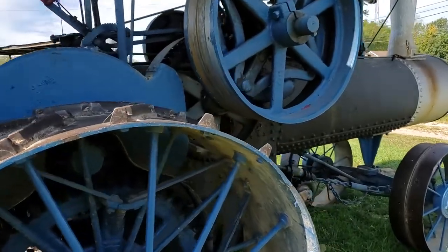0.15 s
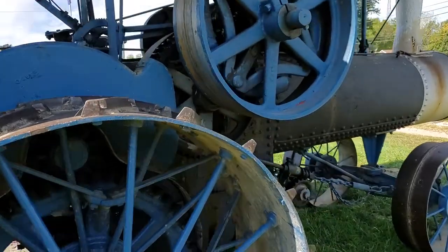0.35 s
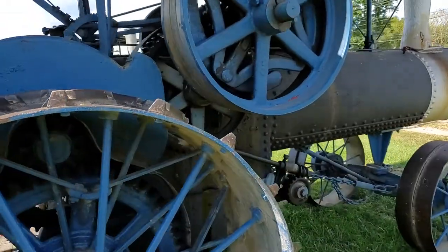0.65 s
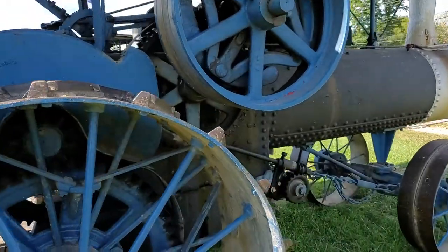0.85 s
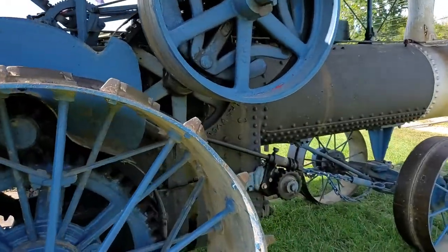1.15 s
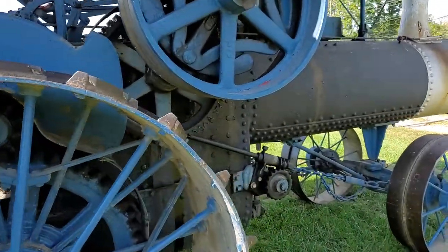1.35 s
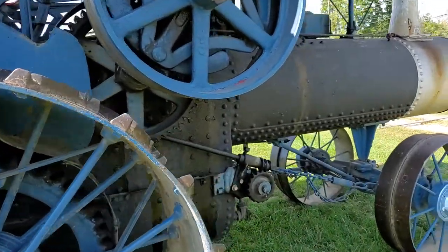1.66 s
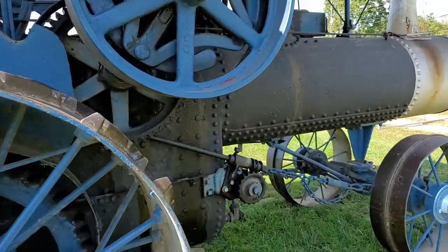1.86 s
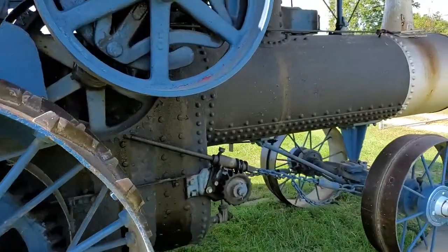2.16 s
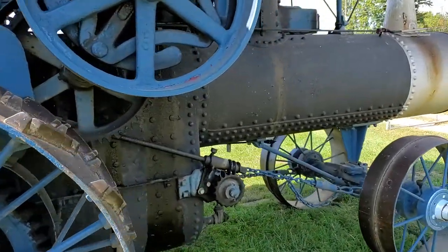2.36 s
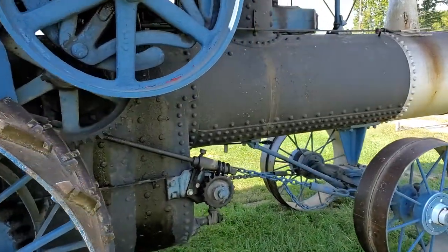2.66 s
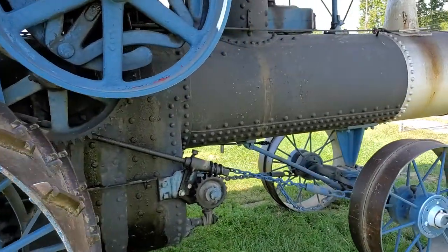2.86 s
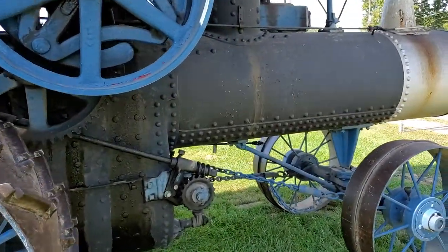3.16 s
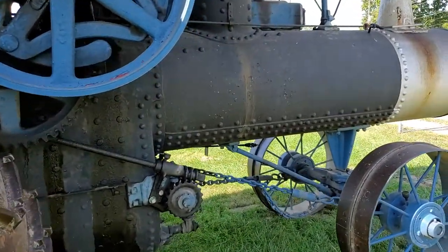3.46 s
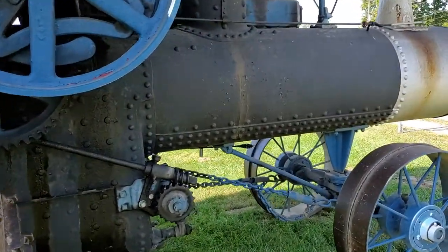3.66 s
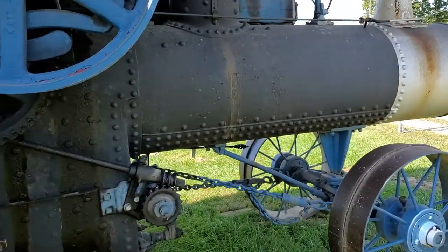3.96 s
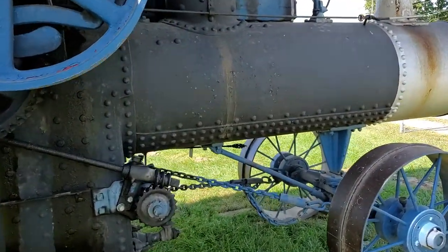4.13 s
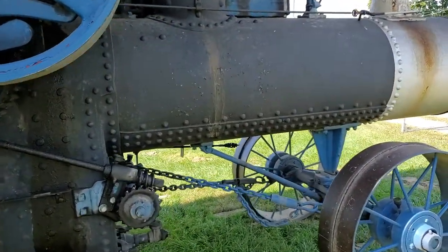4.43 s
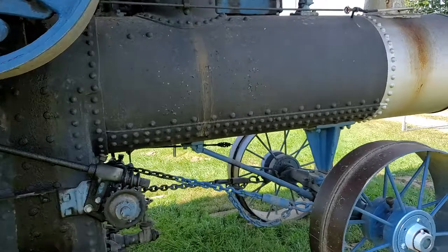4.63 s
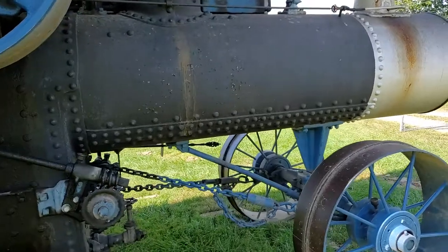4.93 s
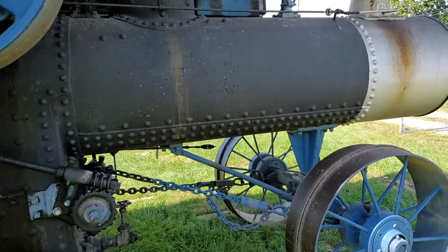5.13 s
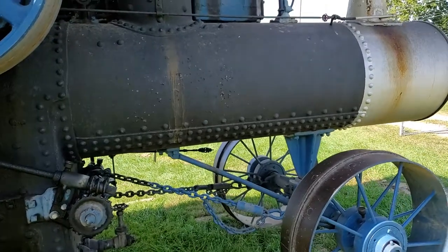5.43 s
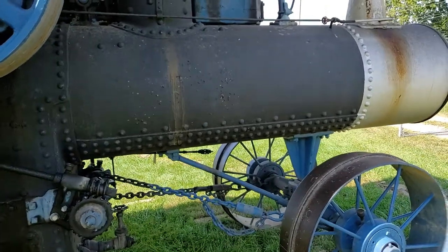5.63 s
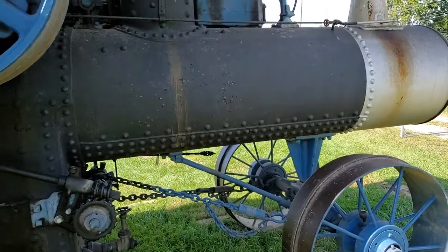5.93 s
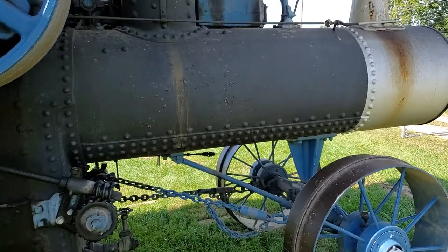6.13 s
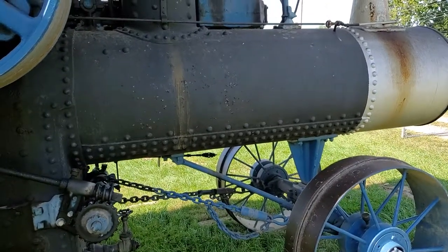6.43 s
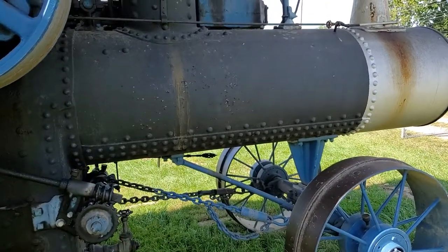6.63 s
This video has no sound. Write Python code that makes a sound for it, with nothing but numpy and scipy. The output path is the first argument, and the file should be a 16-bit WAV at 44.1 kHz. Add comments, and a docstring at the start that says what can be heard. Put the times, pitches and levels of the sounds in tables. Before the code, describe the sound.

Deep lumpy engine throbbing rises and falls close by, over steady steam hiss, crisp rhythmic spits, tiny whistles and a few wet squirts outdoors.

```python
"""Show field, 6.8 s: stereo microphone ports are carried along the boiler of a traction engine ticking over.
From the start an uneven twin, most likely a V-twin, booms close by: firing pulses ring a silencer and tailpipe.
It drops to idle by 1 s. Noise jets hiss and whistle from the cylinder, and noise bursts spit with the crank.
Wet squirts rasp and chirp at 0.2 and 2 s. Revs peak near 2.6 and 3.3 s; a smokebox leak opens from about 3 s.
After 5 s sine strands whine faintly, stray spits thicken, and a third rev is rising at the end."""
import sys
import numpy as np
from scipy import signal
from scipy.fft import rfft, irfft, next_fast_len
from scipy.io import wavfile
from scipy.ndimage import uniform_filter1d

SR = 44100
rng = np.random.default_rng(int(sys.argv[2]) if len(sys.argv) > 2 else 0)


def waveform_to_disk(signal):
    """Save audio, clipped to [-1, 1], as 16-bit WAV at the path in sys.argv[1]."""
    frames = np.transpose(np.atleast_2d(signal))
    scaled = np.clip(frames, -1, 1) * 32767
    samples = np.round(scaled).astype(np.int16)
    wavfile.write(sys.argv[1], SR, samples)


N = 299439
T = np.arange(N) / SR
# frequency axis [Hz] of a padded transform, so that filters do not wrap round
FREQS = np.fft.rfftfreq(2 * next_fast_len(N // 2 + 8192, True), 1 / SR)
PORT_LAG = 20  # delay between the two microphone ports [samples]
IDLE_HZ, FAST_HZ = 10.5, 15.5  # twin's reference speeds [four-stroke cycles/s]


# Twin close by, running speed: (time [s], four-stroke cycles per second [Hz])
TWIN_SPEED = [(0.0, 11.911), (0.57, 10.22), (0.778, 8.747), (1.052, 8.044), (1.47, 10.611), (1.751, 10.093),
              (2.145, 13.187), (2.403, 16.066), (2.631, 17.708), (2.895, 11.767), (3.262, 16.38),
              (4.055, 15.005), (4.29, 14.206), (5.016, 13.891), (5.05, 13.593), (6.098, 11.475),
              (6.482, 16.189), (6.79, 17.677)]
# Twin, boom level before a small trim: (time [s], level [dB])
EXHAUST_LEVEL = [(0.06, -22.5), (0.75, -26), (0.77, -22), (0.99, -27.5), (1.4, -19.5), (1.44, -21),
                 (2.39, -14.5), (2.74, -20), (2.76, -19.5), (2.87, -25), (2.95, -19), (3.21, -14),
                 (3.54, -17.5), (4.92, -18), (5.11, -21), (6.0, -21.5), (6.3, -16), (6.75, -16)]
# Silencer response, relative: (frequency [Hz], gain [dB])
SILENCER_RESPONSE = [(25, -38.5), (33, -18.5), (43, 0), (52, -9), (64, 4), (78, 7), (95, 2), (114, -2),
                     (160, -14), (210, -13.5), (245, -26), (300, -26), (420, -44.5), (4000, -130)]
# Tailpipe response, relative: (frequency [Hz], gain [dB])
TAILPIPE_RESPONSE = [(200, -44.5), (300, 1.5), (355, 4.5), (425, -0.5), (490, -27.5), (900, -21),
                     (5000, -100)]
# Upper silencer resonances: (frequency [Hz], width [Hz], level at FAST_HZ [dB],
# growth with speed [dB per Hz], growth with acceleration [dB per Hz/s])
BARK_RESONANCES = [(121.5, 25, -35, -0.1, 0.6), (170.6, 62, -34.5, 1, 0.61), (228.1, 17, -44.5, 3.5, 0.5)]
# Sharp edge of the blow-down: level at FAST_HZ [dB], growth with speed [dB per Hz]
EDGE_DB, EDGE_DB_PER_HZ = -47, 3.5
# Slow lope: resonance [Hz], width [Hz], level up to IDLE_HZ [dB], change per Hz above it [dB]
LOPE_HZ, LOPE_WIDTH_HZ, LOPE_DB, LOPE_DB_PER_HZ = 51.5, 8.8, -31, -2.83


def twin_engine():
    """Firings boom in the silencer and lope at idle; speed and load bring out its bark and ring the tailpipe."""
    cycle_hz, = curves(TWIN_SPEED)
    exhaust_db, = curves(EXHAUST_LEVEL)
    # only acceleration counts as load
    load = np.maximum(uniform_filter1d(np.gradient(cycle_hz) * SR, size=6000), 0)
    above_fast_hz = cycle_hz - FAST_HZ
    pulses, edges = firings(cycle_hz)

    # gas churns in the pipe between the pulses, most of all at idle
    churn_db = np.interp(cycle_hz, [IDLE_HZ, FAST_HZ], [-4, -15])
    flow = undb(churn_db) * rng.standard_normal(N) - unit(pulses)
    boom = levelled(ring(flow, SILENCER_RESPONSE), exhaust_db - 1.17)

    bark = 0
    for hz, width, db, db_per_hz, db_per_load in BARK_RESONANCES:
        band = filtered(boom, resonance(hz, width / 2) ** 2)
        bark = bark + levelled(band, db + db_per_hz * above_fast_hz + db_per_load * load)

    lope_band = filtered(boom, resonance(LOPE_HZ, LOPE_WIDTH_HZ / 2) ** 2)
    lope = levelled(lope_band, LOPE_DB + LOPE_DB_PER_HZ * np.maximum(cycle_hz - IDLE_HZ, 0))
    edge = levelled(ring(edges, TAILPIPE_RESPONSE), EDGE_DB + EDGE_DB_PER_HZ * above_fast_hz)
    return scattered(boom + bark + lope + edge, wet_db=-21.5, t60_s=0.27)


# Gas pulses of one cycle, in rows: first blow-down, its piston push, second blow-down, its piston push,
# intake gulp: (place in the cycle [0-1], lead by a shorter pipe [s], relative size at IDLE_HZ [ratio],
# relative size at FAST_HZ [ratio], share of the sharp edge [ratio])
GAS_PULSES = [(.194, 0, .75, .75, 1), (.37, 0, .55, -.05, 0), (.63, .0024, .9, 1, .45),
              (.79, 0, .4, .05, 0), (.86, 0, 0, -.42, 0)]


def firings(cycle_hz):
    """The gas pulses of a twin and their sharp edges; slow running is the most ragged."""
    scatter_db, jitter_s = 1.1, .0004  # spreads at FAST_HZ
    turns = np.cumsum(cycle_hz) / SR
    cycles = np.arange(int(turns[-1]) + 1)
    # the extra last sample collects whatever falls past the end
    pulses, edges = np.zeros(N + 1), np.zeros(N + 1)
    for place, lead_s, idle, fast, sharp in GAS_PULSES:
        times = np.interp(cycles + place, turns, T, right=2 * T[-1]) - lead_s
        hz = np.interp(times, T, cycle_hz)
        raggedness = (FAST_HZ / hz) ** 2
        timing, strength = rng.standard_normal((len(times), 2)).T * raggedness
        at = np.clip((times + jitter_s * timing) * SR, 0, N).astype(int)
        size = undb(scatter_db * strength)
        pulses[at] += size * np.interp(hz, [IDLE_HZ, FAST_HZ], [idle, fast])
        edges[at] += size * sharp
    return pulses[:N], edges[:N]


# Walk along the boiler: (time [s], cylinder steam level [dB], smokebox leak level [dB])
BOILER_WALK = [(0, -37, -52), (.6, -38.5, -66), (1.5, -36, -75), (3.2, -38, -45.5), (4.6, -39, -44),
               (5.45, -35.5, -37.5), (6.25, -37, -36.5), (6.79, -36, -45)]
# Steam around cylinder and boiler, relative spectrum: (frequency [Hz], density [dB per Hz])
CYLINDER_STEAM = [(20, -4), (250, 11.5), (500, 4.5), (900, 4.5), (1500, 0), (3400, 0.5), (4600, -4),
                  (6700, -5.5), (7600, -10), (9200, -13), (10500, -14), (12000, -12.5), (14300, -19),
                  (15700, -18)]
# Leak at the smokebox end, relative spectrum: (frequency [Hz], density [dB per Hz])
SMOKEBOX_LEAK = [(400, -48), (570, 3), (670, -7), (770, -17), (930, 4), (1350, -0.5), (1750, -4.5),
                 (2300, -1), (3000, 0.5), (4300, -12), (6500, -13), (8000, -16.5), (12400, -23),
                 (16000, -21)]
# Jets coming into the open between wheels and boiler, level before flicker:
# (time most open [s], half length [s], centre [Hz], width [Hz], level [dB])
OPEN_JETS = [(0.198, 1.4, 970, 650, -44), (1.95, .35, 905, 620, -46.5), (3.0, 3.2, 2420, 2300, -51.5),
             (4.303, 0.083, 2500, 700, -45), (5.44, .45, 2240, 2000, -41), (5.6, 2.7, 12200, 1500, -52),
             (5.7, .9, 2590, 90, -59), (6.4, 2.1, 900, 620, -50.5), (6.22, 0.1, 2700, 1200, -41),
             (6.6, 0.69, 2980, 1500, -41), (6.55, 0.63, 2980, 256, -46)]


def leaks():
    """Turbulent steam sputters from the cylinder on the left and from the smokebox end on the right."""
    steam_db, front_db = curves(BOILER_WALK)
    near = unit(filtered(jet(PORT_LAG, direct=0.35), response(CYLINDER_STEAM))) * undb(steam_db)
    for s, half_s, hz, width, db in OPEN_JETS:
        hiss = unit(filtered(jet(PORT_LAG, direct=0.13), resonance(hz, width / 2)))
        near = near + hiss * undb(db) * bell(s, half_s)
    near_flicker_db = 0.98 * wander(25) + 1.38 * wander(250)

    # the negative lag brings the smokebox hiss to the right port first
    front = unit(filtered(jet(-PORT_LAG, direct=0.99), response(SMOKEBOX_LEAK)))
    front_flicker_db = 1.1 * wander(6.1) + 1.4 * wander(120)
    return near * undb(near_flicker_db) + front * undb(front_db + front_flicker_db)


# Colour of a spit centred on SPIT_HZ, relative: (frequency [Hz], gain [dB])
SPIT_SPECTRUM = [(800, -23), (2200, 7), (3500, 0.5), (4800, 6.5), (6200, 10.5), (7500, -4), (10000, -2.5),
                 (16000, -15)]
# The first, wettest spits trail most: (time [s], level of the tail against the crack [dB])
TAIL_LEVEL = [(.55, -30), (.67, -1), (1.3, -11), (6.7, -23)]
SPIT_HZ = 5800
# Decay times of the short crack and its softer trailing hiss [s]
SPIT_CRACK_S, SPIT_TAIL_S = 0.0041, 0.031


def spits(spit_rows, rise_s=0.00072, gain_db=-2.5, size=4096):
    """Wet steam forced through a gland makes short noise bursts, each a crack with a trailing hiss."""
    out = np.zeros((2, N + size))
    t, freqs = np.arange(size) / SR, np.fft.rfftfreq(size, 1 / SR)
    rise = 1 - np.exp(-(t / rise_s) ** 2)
    for s, db, hz in spit_rows:
        # stretching the frequency axis moves the colour to this spit's centre
        colour = response(SPIT_SPECTRUM, freqs * SPIT_HZ / hz)
        gas = unit(irfft(rfft(rng.standard_normal((2, size))) * colour))
        tail = undb(np.interp(s, *np.transpose(TAIL_LEVEL)))
        burst = rise * (np.exp(-t / SPIT_CRACK_S) + tail * np.exp(-t / SPIT_TAIL_S))
        start = int(s * SR)
        out[:, start:start + size] += gas * burst / burst.max() * undb(db + gain_db)
    return out[:, :N]


# Loud spits of wet steam, level before the trim in spits(): (time [s], level [dB], centre [Hz])
LOUD_SPITS = [(0.6707, -28.5, 5400), (0.7923, -28, 5100), (0.9176, -27, 5470), (1.166, -31, 5100),
              (1.292, -32, 6100), (1.4165, -28, 6100), (1.7795, -36, 6170), (1.897, -28.5, 4000),
              (2.6523, -31.5, 5550), (3.1631, -28.5, 6300), (3.495, -29.5, 6360), (3.6074, -27.5, 6060),
              (3.718, -30.5, 5700), (4.059, -29.5, 6520), (4.1734, -28.5, 6200), (4.2884, -30.5, 6400),
              (5.229, -32, 6660), (5.467, -31.5, 6700), (5.5847, -28, 6450), (5.8204, -29, 3560),
              (6.109, -27, 3830), (6.2282, -29, 6200), (6.3466, -30.5, 6690), (6.632, -26.5, 5740),
              (6.6915, -29, 6710), (6.7268, -30, 6500), (6.7494, -27.5, 6600)]
# Steam engine turning over: (time [s], piston strokes per second [Hz])
PISTON_STROKES = [(0.0, 9.891), (0.7, 7.958), (1.3, 8.111), (3.45, 9.098), (4.7, 8.428), (5.6, 8.476),
                  (6.2, 8.685), (6.79, 8.473)]
# Faint spit of an ordinary stroke: level before that trim [dB], scatter [dB], centre [Hz]
STROKE_DB, STROKE_SCATTER_DB, STROKE_CENTRE_HZ = -36.5, 3.1, 6200
# Strays gather toward the smokebox, at the end: level before that trim [dB], scatter [dB], spread [s]
STRAY_DB, STRAY_SCATTER_DB, STRAY_SPREAD_S = -33, 1.5, 1.1


def spitting(count=16):
    """Rows (time [s], level [dB], centre [Hz]): loud spits, a faint one per remaining stroke, and strays."""
    rows, loud_s = list(LOUD_SPITS), np.transpose(LOUD_SPITS)[0]
    stroke_hz, = curves(PISTON_STROKES)
    strokes_done = np.floor(np.cumsum(stroke_hz) / SR)
    stroke_s = T[1:][np.diff(strokes_done) > 0]
    for s, (strength, colour) in zip(stroke_s, rng.standard_normal((len(stroke_s), 2))):
        # a loud spit within 20 ms already stands for this stroke
        if np.abs(loud_s - s).min() > .02:
            hz = STROKE_CENTRE_HZ * np.exp(0.047 * colour)
            rows.append((s, STROKE_DB + STROKE_SCATTER_DB * strength, hz))
    for place, strength, colour in rng.standard_normal((count, 3)):
        s = max(T[-1] - STRAY_SPREAD_S * abs(place), 0)
        hz = STROKE_CENTRE_HZ * np.exp(0.17 * colour)
        rows.append((s, STRAY_DB + STRAY_SCATTER_DB * strength, hz))
    return rows


# Thin whistles of the leaks, levels before a fast flutter: (frequency [Hz], width [Hz],
# resting level [dB], flicker [dB], level against a passing spit [dB])
LEAK_WHISTLES = [(5620, 57, -60, 2, -24), (6710, 220, -57, -1, -18.5), (13570, 700, -59, 4.5, -37)]
# A whistle flares up: (time at the middle [s], half length [s], nearest whistle [Hz], level [dB])
WHISTLE_FLARES = [(0.014, .03, 5660, -44.5), (0.143, .03, 6710, -53), (.81, 0.022, 13570, -43),
                  (0.873, 0.015, 5660, -40), (1.29, .025, 13570, -48), (1.904, 0.033, 13570, -47),
                  (2.248, 0.091, 6710, -48), (2.654, .02, 5660, -50), (2.79, 0.02, 5660, -46),
                  (3.057, .03, 6710, -46), (3.2, .06, 13570, -51), (3.426, .02, 5660, -44),
                  (3.698, 0.064, 5660, -45), (3.773, 0.062, 13570, -50), (4.02, .018, 13570, -41),
                  (4.83, 0.015, 5660, -44), (5.044, 0.017, 5660, -41.5), (5.11, .025, 13570, -44),
                  (5.647, 0.013, 5660, -42), (6.6, 0.024, 5660, -42)]
# Decay after a spit [s] and rate of the resting flicker [per s]
WHISTLE_RING_S, FLICKER_PER_S = 0.016, 11


def whistles(spit_rows):
    """Narrow gaps sing unsteadily; each spit blows them harder, and now and then one flares up."""
    out, pitches = 0, np.transpose(LEAK_WHISTLES)[0]
    kicks = np.zeros(N)
    for s, db, _ in spit_rows:
        kicks[min(int(s * SR), N - 1)] += undb(db)
    blown = signal.lfilter([1], [1, -np.exp(-1 / (WHISTLE_RING_S * SR))], kicks)

    for k, (hz, width, rest_db, flicker_db, spit_db) in enumerate(LEAK_WHISTLES):
        flares = 0
        for s, half_s, which_hz, db in WHISTLE_FLARES:
            if np.abs(pitches - which_hz).argmin() == k:
                flares = flares + undb(db) * bell(s, half_s)
        resting = undb(rest_db + flicker_db * wander(FLICKER_PER_S))
        drive = np.sqrt(resting ** 2 + (undb(spit_db) * blown) ** 2 + flares ** 2)
        tone = unit(filtered(jet(PORT_LAG, direct=0.44), resonance(hz, width / 2)))
        out = out + tone * drive * undb(2.5 * wander(70))
    return out


# Longer squirts: (time at the middle [s], half length [s], rasp level [dB], chirp pitch at the middle [Hz])
WATER_SQUIRTS = [(0.177, 0.015, -35.5, 3350), (1.944, 0.03, -39, 3080), (2.024, 0.023, -43, 2500)]
# Resonances of the squirting gap, relative: (frequency [Hz], width [Hz], gain [dB])
GAP_RESONANCES = [(930, 680, -16), (2500, 2000, 0), (3270, 180, -1), (5100, 800, -1), (9000, 1040, -2)]
# Chirp: level against the rasp [dB], glide [Hz per s], wobble [Hz]
CHIRP_DB, CHIRP_GLIDE_HZ_PER_S, CHIRP_WOBBLE_HZ = -4.5, -3000, 130


def squirts():
    """Now and then a slug of water squirts out with a rasp and a brief falling chirp."""
    gap = sum(undb(db) * resonance(hz, width / 2) for hz, width, db in GAP_RESONANCES)
    rasp, out = unit(filtered(jet(PORT_LAG, direct=0.17), gap)), 0
    for s, half_s, db, hz in WATER_SQUIRTS:
        glide_hz = CHIRP_GLIDE_HZ_PER_S * np.clip(T - s, -2 * half_s, 2 * half_s)
        chirp = sine(hz + glide_hz + CHIRP_WOBBLE_HZ * wander(500))
        out = out + undb(db) * bell(s, half_s) * (rasp + undb(CHIRP_DB) * chirp)
    return out


# Faint whine, level before strand offset and flicker: (time [s], pitch [Hz], level [dB])
WHINE_COURSE = [(4.8, 625, -80), (5.1, 635, -58), (5.65, 670, -54), (5.9, 686, -55), (6.15, 670, -54),
                (6.37, 664, -50), (6.54, 677, -48), (6.79, 704, -55)]
# Strands of the whine: (multiple of its pitch [ratio], level offset [dB])
STRANDS = [(1, 0.5), (.875, -5)]


def whine():
    """Two sine strands of wavering pitch and level make a faint whine that ends higher than it began."""
    hz, db = curves(WHINE_COURSE)
    out = 0
    for multiple, strand_db in STRANDS:
        strand = sine(multiple * hz + 5 * wander(50))
        out = out + strand * undb(db + strand_db + 2.5 * wander(30))
    return out


def scattered(x, wet_db, t60_s, size=8192):
    """Iron wheels and boiler throw a short, diffuse tail to each port."""
    tail = rng.standard_normal((2, size)) * undb(-60 * np.arange(size) / SR / t60_s)
    wet = signal.fftconvolve(x[None], unit(tail) / np.sqrt(size), axes=1)[:, :N]
    return x + undb(wet_db) * wet


def long_waves(x, alike_hz=380):
    """The two ports are close together, so they hear the bass alike."""
    alike = 1 / (1 + (FREQS / alike_hz) ** 4)
    mid, side = x[0] + x[1], filtered(x[0] - x[1], np.sqrt(1 - alike))
    return np.array([mid + side, mid - side]) / 2


def jet(lag, direct):
    """Stereo turbulence: a direct share that reaches the right port lag samples late, the rest scattered."""
    source = rng.standard_normal(N)
    direct = np.clip(direct, 0, 1)
    straight = np.array([source, np.roll(source, lag)])
    return np.sqrt(direct) * straight + np.sqrt(1 - direct) * rng.standard_normal((2, N))


def ring(x, points, size=32768):
    """Pass x through a causal body that has the given response."""
    # folding the cepstrum forward gives the minimum-phase response
    cepstrum = irfft(np.log(response(points, np.fft.rfftfreq(size, 1 / SR))))
    cepstrum[1:size // 2] *= 2
    cepstrum[size // 2 + 1:] = 0
    return signal.fftconvolve(x, irfft(np.exp(rfft(cepstrum))))[:N]


def levelled(x, db):
    """Give x the level db, taken over a few firings."""
    power = uniform_filter1d(uniform_filter1d(x ** 2, size=5000), size=5000)
    return x * undb(db) / np.sqrt(power + 1e-12)


def resonance(hz, half_width):
    """Gain of a resonance that falls to half at half_width [Hz] from its centre."""
    return 1 / (1 + ((FREQS - hz) / half_width) ** 2)


def response(points, freqs=FREQS):
    """Gain of (frequency [Hz], level [dB]) points on a log-frequency axis."""
    hz, db = np.transpose(points)
    return undb(np.interp(np.log(freqs + 1e-9), np.log(hz), db))


def filtered(x, gain):
    """Apply a gain given on FREQS."""
    size = 2 * (len(FREQS) - 1)
    return irfft(rfft(x, size) * gain, size)[..., :N]


def curves(table):
    """Each column of a table, joined by straight lines in time."""
    s, *columns = np.transpose(table)
    return [np.interp(T, s, c) for c in columns]


def wander(rate):
    """Random knots of spread 1, rate per second, joined by straight lines."""
    knots = np.arange(0, T[-1] + 1, 1 / rate)
    return np.interp(T, knots, rng.standard_normal(len(knots)))


def bell(s, half_s):
    """A smooth opening and closing around time s."""
    return np.exp(-((T - s) / half_s) ** 2)


def sine(hz):
    """A tone of rms 1 that follows a pitch curve."""
    return np.sqrt(2) * np.sin(2 * np.pi * np.cumsum(hz) / SR)


def unit(x):
    """Scale to rms 1."""
    return x / np.sqrt(np.mean(x ** 2))


def undb(db):
    """Amplitude ratio of a level in dB."""
    return 10 ** (np.asarray(db) / 20)


def scene():
    """The twin close by, and the traction engine's hiss, spits, whistles and squirts, with the faint whine."""
    spit_rows = spitting()
    steam = long_waves(leaks()) + whistles(spit_rows) + spits(spit_rows) + squirts()
    return twin_engine() + steam + whine()


# The two microphone ports: (frequency [Hz], left minus right [dB])
PORT_DIFFERENCE = [(100, .3), (200, .9), (700, 2.2), (3300, 1.2), (4400, 5), (6700, 6), (7600, 1.5),
                   (10200, 1.5), (12000, -5.5), (13400, 2), (16000, 1.5)]
TOP_HZ = 15700  # the microphone's upper limit


def record(dry):
    """Each port colours the sound in its own way; the top is cut."""
    # half of the difference goes to each side
    tilt = np.sqrt(response(PORT_DIFFERENCE))
    ports = np.array([filtered(dry[0], tilt), filtered(dry[1], 1 / tilt)])
    return signal.sosfilt(signal.ellip(10, .2, 80, TOP_HZ, fs=SR, output="sos"), ports)


dry = scene()
out = record(dry)
waveform_to_disk(out)
```